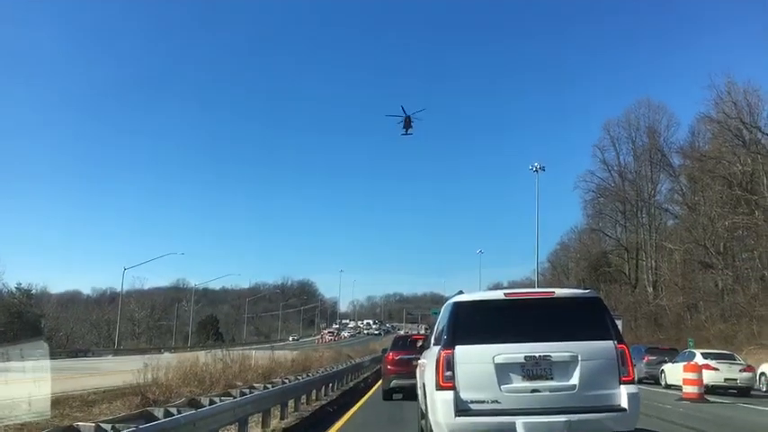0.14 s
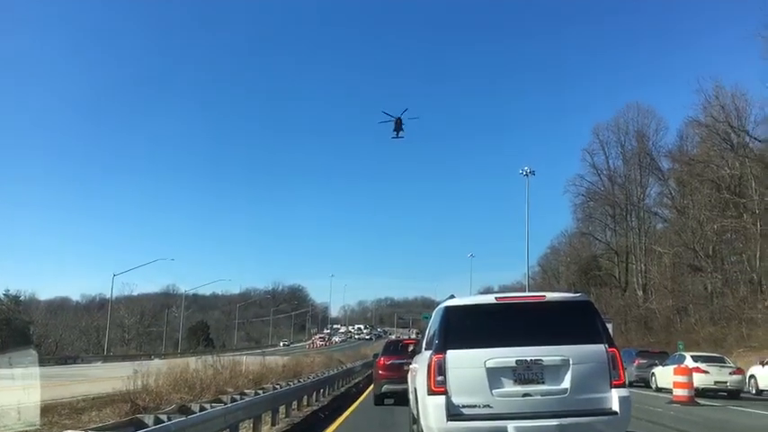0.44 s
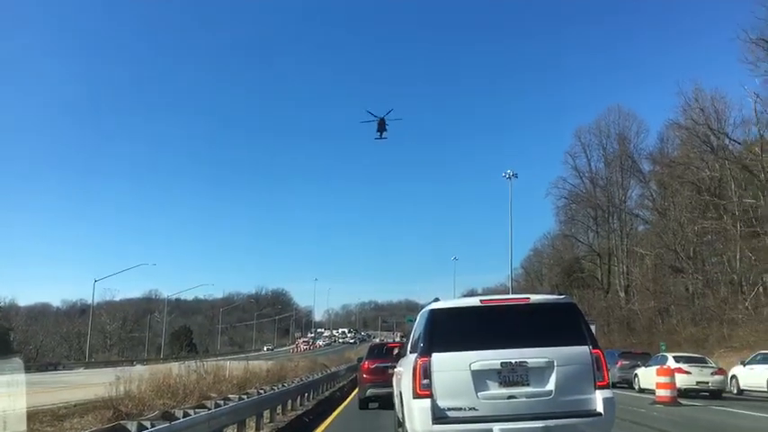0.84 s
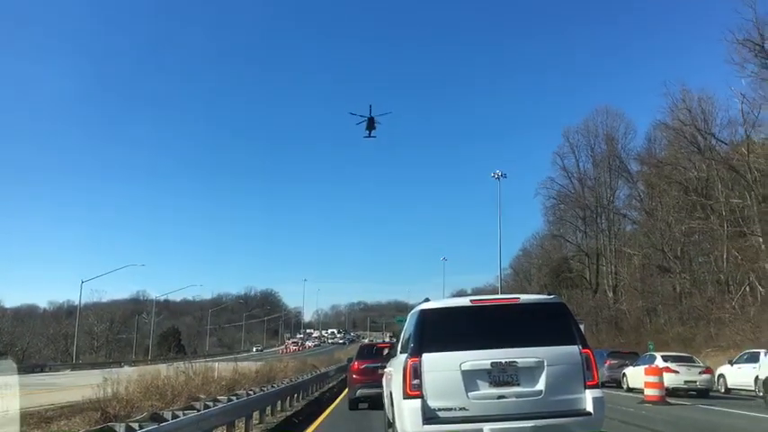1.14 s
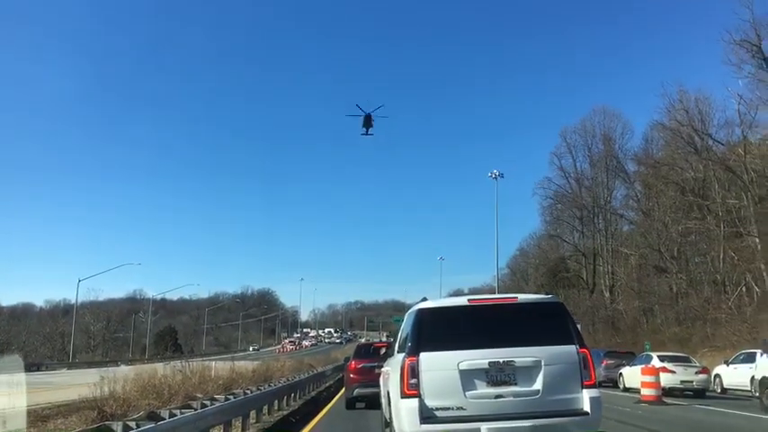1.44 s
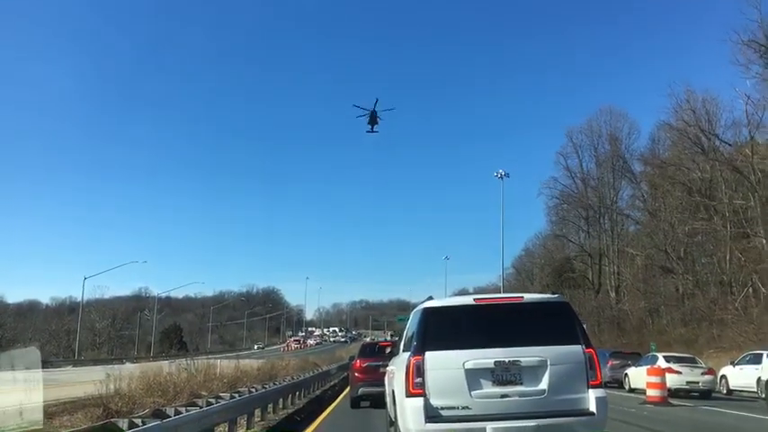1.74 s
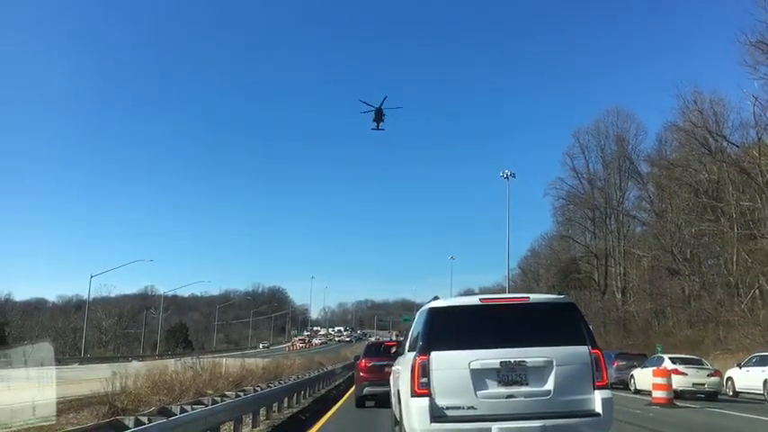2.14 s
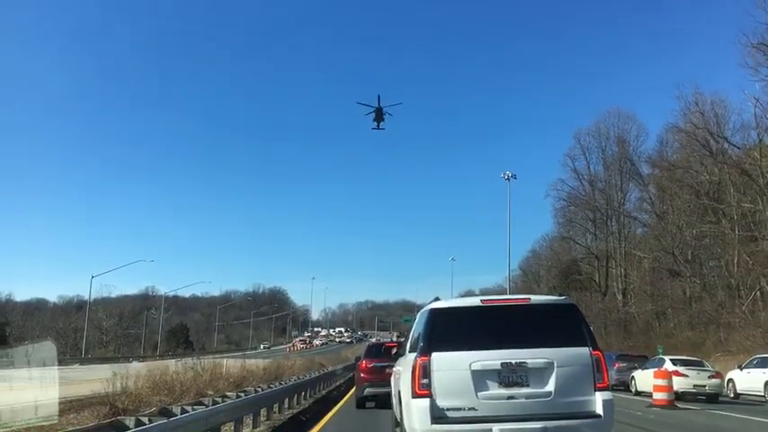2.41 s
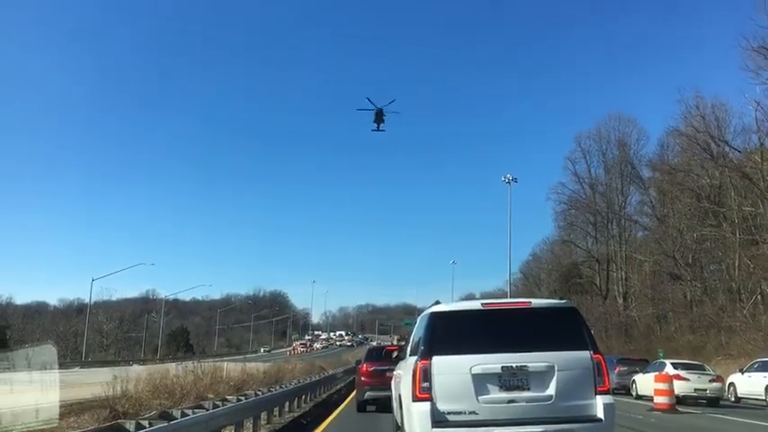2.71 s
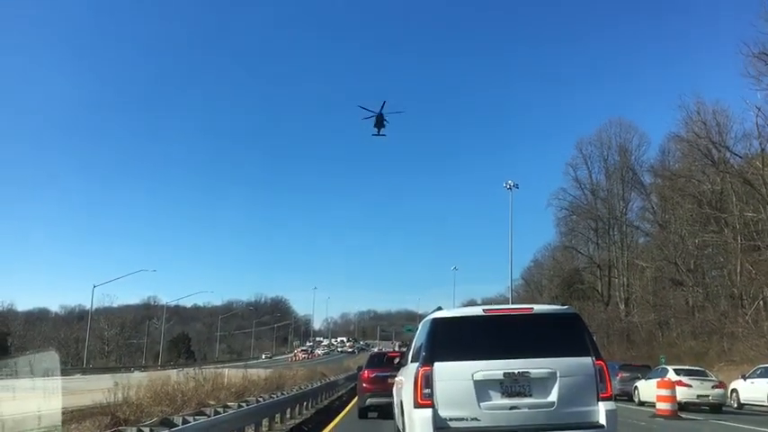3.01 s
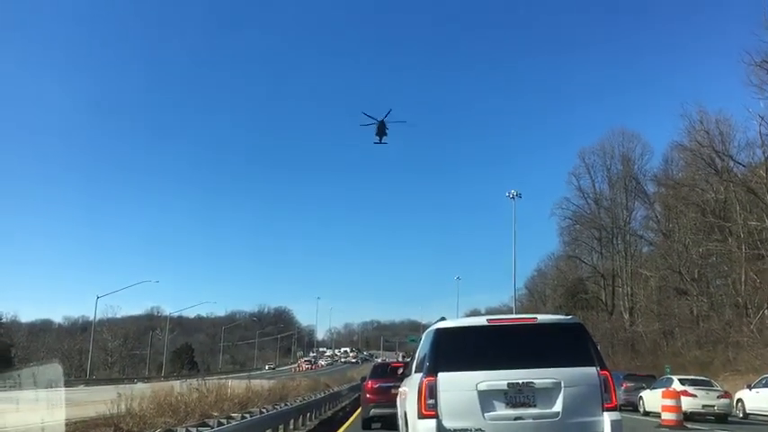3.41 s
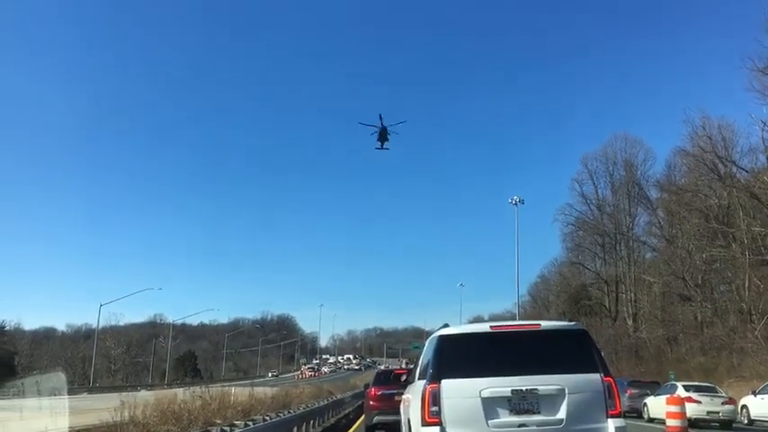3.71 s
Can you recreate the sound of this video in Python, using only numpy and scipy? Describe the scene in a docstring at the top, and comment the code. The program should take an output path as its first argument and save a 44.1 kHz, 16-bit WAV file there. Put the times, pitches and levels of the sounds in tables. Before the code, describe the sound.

A helicopter hovers overhead throughout, heard muffled from the dashboard of a closed, idling car. For the first two seconds, rapid, even blade slaps pulse over a deep boom and a light swish. From about 2.3 seconds they sink into rough churning with a few harder slaps, and the boom briefly dips around 3.5 seconds. Low engine and fan hum and dull highway rumble run underneath.

```python
"""Helicopter over a traffic jam

Phone microphone at the dashboard of an idling car, windows shut, a helicopter hanging overhead.
Close by are engine hum and fan; the highway comes in muffled. The cabin booms at twice the blade
rate, torn air churns and swishes behind each blade, and each blade's slap rings the cabin.
After two seconds the slaps sink into a rough churning."""
import sys
import numpy as np
from scipy import signal
from scipy.fft import rfft, irfft, next_fast_len
from scipy.io import wavfile
from scipy.ndimage import uniform_filter1d

SR = 44100
rng = np.random.default_rng(int(sys.argv[2]) if len(sys.argv) > 2 else 0)


def log_audio(samples):
    """Write samples as a 16-bit WAV file to the path given in sys.argv[1]."""
    # one column per channel
    frames = np.atleast_2d(samples).T
    # limit to full scale, then quantise
    limited = np.clip(frames, -1, 1)
    pcm = np.round(limited * 32767).astype(np.int16)
    wavfile.write(sys.argv[1], SR, pcm)


N = 170226

# idle hum, close by (multiple of the firing rate, level [dB])
IDLE_HARMONICS = [(2, -48.5), (3, -55)]
# highway rumble from inside the car (frequency [Hz], relative level [dB])
ROAD_SPECTRUM = [(20, -33), (33, -22.5), (43, 1), (52, 4), (70, -3.5), (110, -1.5), (160, -3), (260, -9),
                 (400, -7.5), (600, -20), (1000, -28.5), (1500, -36), (2500, -48), (4000, -54),
                 (8000, -66.5), (16000, -79)]
# tyres on the far lanes (frequency [Hz], relative level [dB])
TYRE_SPECTRUM = [(30, -31.5), (400, -7), (650, 1), (1000, -3), (1250, -7), (1600, -14), (2500, -27),
                 (4000, -33), (8000, -49), (16000, -67)]
# rise and fall of those tyres (time [s], level [dB])
TYRE_LEVEL = [(0, -58.5), (.6, -61.5), (1.3, -59), (1.9, -59.5), (2.4, -54), (2.85, -56), (3.2, -56.5),
              (3.55, -56), (3.86, -53)]
# cabin resonances around the microphone (frequency [Hz], width [Hz], lift [dB])
CABIN_MODES = [(204.6, 22, 8.5), (234.8, 8, 6), (307.8, 24.5, 10), (338.86, 29.4, 10), (382.8, 55, 4),
               (433, 40, 3.5), (537, 76, 7.5), (662, 23, 7), (706.3, 35, 7.5), (789.4, 23, 9.5),
               (851.4, 23, 6.5), (968, 21, 9), (1058, 26, 7), (1183, 40, 6)]
# window resonances (frequency [Hz], width [Hz], lift [dB])
GLASS_MODES = [(1518, 40, 4), (1700, 40, 2), (1880, 55, 5), (2130, 110, 3.5), (3350, 400, 3)]
# blades passing overhead (time [s], rate [Hz])
BLADE_HZ = [(0, 26.233), (2.15, 26.233), (2.4, 25.85), (2.9, 25.9), (3.4, 26.05), (3.86, 26.15)]
# cabin boom (time [s], level [dB])
BOOM_LEVEL = [(0, -25.5), (.2, -38), (.45, -32.5), (.85, -30), (1.12, -32), (1.45, -32), (2.05, -32),
              (2.4, -31), (2.58, -33), (2.66, -40), (2.75, -34), (3.27, -32.5), (3.38, -39.5), (3.48, -39),
              (3.57, -58), (3.66, -33), (3.75, -50), (3.85, -30)]
# weaker rotor harmonics (multiple of the blade rate, level against the boom [dB])
BOOM_OVERTONES = [(3, -26.5), (4, -20)]
# the rotor from the dashboard (time [s], slap level [dB], churn level [dB], churn decay [s])
SLAP_AND_CHURN = [(0, -40, -35.5, 0.0051), (.2, -37, -48.5, 0.0069), (.3, -41, -45.5, 0.0065),
                  (.6, -39, -42.5, 0.0094), (.85, -38.5, -51, 0.0057), (1.25, -37, -57.5, 0.014),
                  (1.37, -42, -42.5, 0.01), (1.55, -35.5, -45.5, 0.0072), (1.85, -38, -43.5, .009),
                  (1.98, -43.5, -43.5, 0.0045), (2.2, -39, -39.5, 0.011), (2.36, -51, -42, 0.01),
                  (2.66, -50.5, -43.5, 0.02), (2.8, -44, -38.5, 0.034), (3.05, -48, -40.5, 0.032),
                  (3.3, -43.5, -40.5, 0.025), (3.44, -39.5, -41, 0.015), (3.63, -48.5, -37.5, 0.053),
                  (3.74, -50, -36.5, .025), (3.86, -45, -39, 0.039)]
# churning through glass and roof (frequency [Hz], relative level [dB])
CHURN_SPECTRUM = [(30, -31.5), (120, -15), (200, -8.5), (270, -2), (350, -1), (440, -0.5), (520, -9.5),
                  (700, -14.5), (1000, -19), (1500, -29), (3000, -55.5), (16000, -85)]
# blade swish (time [s], level [dB], steady floor between blades [ratio])
SWISH_SHAPE = [(0, -67.5, .06), (.2, -69, .06), (.45, -67.5, .06), (.58, -65.5, .06), (.75, -70.5, .06),
               (1.0, -69.5, .06), (1.4, -73.5, .06), (1.65, -66.5, .05), (1.95, -63, .05), (2.3, -63.5, .1),
               (2.6, -67.5, .3), (3.1, -72, .3), (3.45, -69.5, .3), (3.8, -66, .15)]
# swish through glass and roof (frequency [Hz], relative level [dB])
SWISH_SPECTRUM = [(30, -30), (400, -8), (900, 2), (1400, 0), (2100, -2), (2700, -6.5), (3500, -10),
                  (4200, -22), (5000, -31), (16000, -60)]
# slaps through glass and roof (frequency [Hz], relative level [dB])
SLAP_SPECTRUM = [(30, -21.5), (120, -6.5), (200, -8), (270, -6), (330, -0.5), (420, -2.5), (520, -8.5),
                 (650, -29), (1000, -36), (2000, -47), (5000, -72.5), (16000, -91)]
# blades that cut a tip vortex and slap harder (time [s], extra level [dB])
VORTEX_HITS = [(.193, 5.5), (.231, 4.5), (.383, 5), (.574, 6.5), (.765, 4.5), (.917, 2.5), (.955, 3),
               (1.07, 2), (1.26, 3.5), (1.603, 0.5), (1.755, 2.5), (2.099, 3), (2.213, 3), (2.526, 14),
               (2.764, 9.5), (3.295, 5.5), (3.64, 12)]
# the phone's own hiss (frequency [Hz], relative level [dB])
HISS_SPECTRUM = [(30, 2), (4000, 1.5), (4900, -1.5), (5800, 2.5), (6800, 2), (7600, -1), (8800, 3),
                 (9800, 0.5), (10400, -3), (11200, -0.5), (13500, -3), (16000, -2)]

CAR_MODES = CABIN_MODES + GLASS_MODES


def undb(db):
    """Decibels to gain."""
    return 10 ** (np.asarray(db) / 20)


def unit(x):
    """Scale to rms 1."""
    return x / np.sqrt(np.mean(x ** 2))


def curve(table, t, column=1):
    """One column of a table, joined by straight lines."""
    rows = np.array(table, float)
    return np.interp(t, rows[:, 0], rows[:, column])


def waver(rate_hz):
    """Random levels, each held 1 / rate_hz seconds, smoothed twice; rms 1."""
    step = int(SR / rate_hz)
    held = np.repeat(rng.standard_normal(N // step + 1), step)
    return unit(uniform_filter1d(uniform_filter1d(held, step), step)[:N])


def colour(x, spectrum, modes=()):
    """Causal filter with a smooth slope and ringing resonances; rms 1."""
    size = 2 * next_fast_len(N // 2 + SR // 4)
    hz = np.arange(size // 2 + 1) * SR / size
    rows = np.array(spectrum, float)
    db = np.interp(np.log(hz + 1), np.log(rows[:, 0]), rows[:, 1])
    for centre, width, lift in modes:
        db = db + lift / (1 + (2 * (hz - centre) / width) ** 2)
    # minimum phase: the ringing follows each hit
    cepstrum = irfft(np.log(undb(db)), size)
    cepstrum[1:size // 2] *= 2
    cepstrum[size // 2 + 1:] = 0
    response = np.exp(rfft(cepstrum))
    return unit(irfft(rfft(x, size) * response, size)[:N])


def engine_hum(t, firing_hz=23.15, fan_hz=101.3, fan_db=-50, waver_db=.8):
    """Just ahead of the microphone: harmonics of the engine's firing, and one tone from the fan."""
    tones = [(round(k) * firing_hz, db) for k, db in IDLE_HARMONICS] + [(fan_hz, fan_db)]
    return np.sqrt(2) * sum(undb(db + waver_db * waver(6.4)) * np.cos(2 * np.pi * hz * t)
                            for hz, db in tones)


def highway(t, rumble_db=-42):
    """Outside: steady rumble and tyres on the far lanes, muffled by the car's body."""
    rumble = colour(rng.standard_normal(N), ROAD_SPECTRUM, CAR_MODES)
    tyres = colour(rng.standard_normal(N), TYRE_SPECTRUM, CAR_MODES)
    return rumble * undb(rumble_db) + tyres * undb(curve(TYRE_LEVEL, t))


def cabin_boom(t, passes, blade_hz, lag_s=.0098):
    """The air around the microphone swings at twice the blade rate, with weaker harmonics above."""
    angle = 2 * np.pi * (passes - lag_s * blade_hz)
    overtones = sum(undb(db + waver(11)) * np.cos(round(k) * angle) for k, db in BOOM_OVERTONES)
    return np.sqrt(2) * (np.cos(2 * angle) + overtones) * undb(curve(BOOM_LEVEL, t))


def torn_air(blade_age, attack_s, decay_s, floor):
    """A burst of noise behind each blade over a steady floor, at an even average power."""
    envelope = (1 - np.exp(-blade_age / attack_s)) * np.exp(-blade_age / decay_s) + floor
    running_rms = np.sqrt(uniform_filter1d(envelope ** 2, size=6720))  # about four blades
    return envelope / running_rms * rng.standard_normal(N)


def blade_churn(t, blade_age, waver_db=.6):
    """Overhead: the low, rough part of the torn air, coming through glass and roof."""
    bursts = torn_air(blade_age, attack_s=.002, decay_s=curve(SLAP_AND_CHURN, t, column=3), floor=.091)
    level_db = curve(SLAP_AND_CHURN, t, column=2) + waver_db * waver(14)
    return colour(bursts, CHURN_SPECTRUM, CAR_MODES) * undb(level_db)


def reflected(x, decay_s=.006, level_db=-3):
    """Add dense reflections from nearby glass and trim, gone in a few hundredths of a second."""
    age = np.arange(SR // 16) / SR
    tail = rng.standard_normal(len(age)) * np.exp(-age / decay_s)
    return x + undb(level_db) * signal.fftconvolve(x, tail / np.linalg.norm(tail))[:N]


def blade_swish(t, blade_age):
    """Overhead: the higher, rounder part of the torn air, smeared by reflections in the cabin."""
    bursts = torn_air(blade_age, attack_s=.008, decay_s=.0095, floor=curve(SWISH_SHAPE, t, column=2))
    return colour(reflected(bursts), SWISH_SPECTRUM, CAR_MODES) * undb(curve(SWISH_SHAPE, t))


def blade_slaps(t, passes, jitter_s=.0005, scatter_db=1.3, second_path_s=.003274, second_path_db=6.5):
    """One pressure spike per blade, a little uneven in time and strength, rings the cabin from above."""
    times = np.interp(np.arange(int(passes[-1]) + 1), passes, t)
    strength_spread, time_spread = rng.standard_normal((len(times), 2)).T
    accent_db = scatter_db * strength_spread
    for when, extra_db in VORTEX_HITS:
        accent_db[np.argmin(abs(times - when))] = extra_db
    strengths = undb(accent_db + curve(SLAP_AND_CHURN, times))
    onsets = np.clip((times + jitter_s * time_spread) * SR, 0, N - 1).astype(int)
    spikes = np.zeros(N)
    spikes[onsets] = strengths
    # each slap arrives again, louder, by a longer way
    spikes = spikes + undb(second_path_db) * np.roll(spikes, int(second_path_s * SR))
    return colour(spikes, SLAP_SPECTRUM, CABIN_MODES) * np.sqrt(np.mean(strengths ** 2))


def scene():
    """Traffic and rotor as they reach the dashboard, in mono."""
    first_blade_s, air_lead_s = .0356, .00086
    t = np.arange(N) / SR
    blade_hz = curve(BLADE_HZ, t)
    passes = np.cumsum(blade_hz) / SR - first_blade_s * blade_hz[0]  # running count of blades
    blade_age = (passes + air_lead_s * blade_hz) % 1 / blade_hz  # seconds since the air last tore
    rotor = blade_slaps(t, passes) + blade_churn(t, blade_age) + blade_swish(t, blade_age)
    return (rotor + cabin_boom(t, passes, blade_hz) + engine_hum(t) + highway(t))[None]


def record(dry, hiss_db=-78, top_hz=15700):
    """The phone on the dashboard adds faint hiss and cuts the top."""
    hiss = undb(hiss_db) * colour(rng.standard_normal(N), HISS_SPECTRUM)
    lowpass = signal.ellip(8, .2, 70, top_hz, fs=SR, output="sos")
    return signal.sosfilt(lowpass, dry + hiss)


dry = scene()
out = record(dry)
log_audio(out)
```